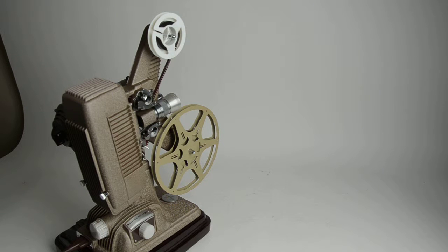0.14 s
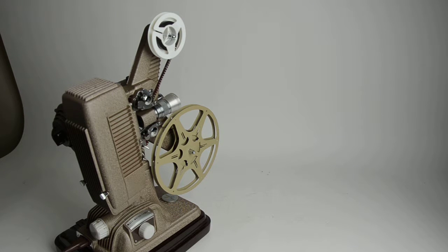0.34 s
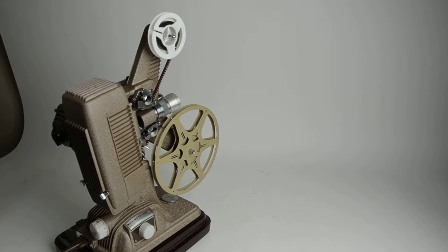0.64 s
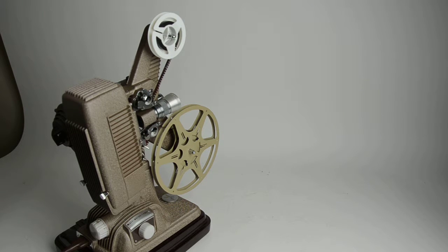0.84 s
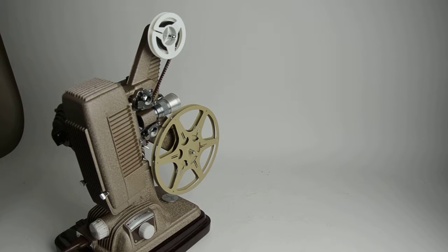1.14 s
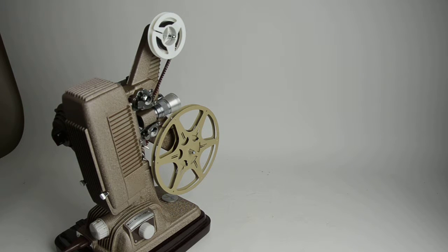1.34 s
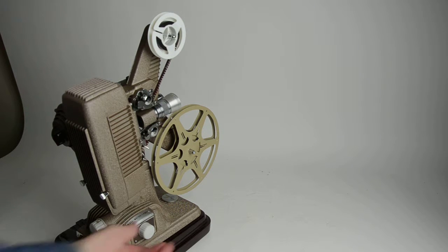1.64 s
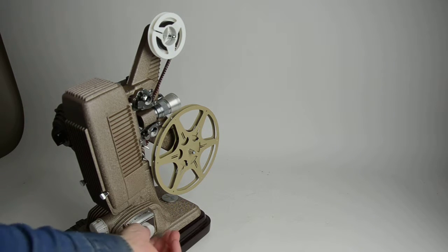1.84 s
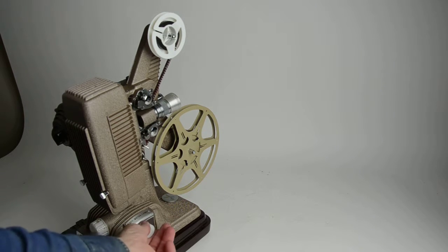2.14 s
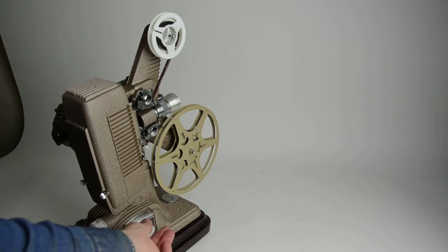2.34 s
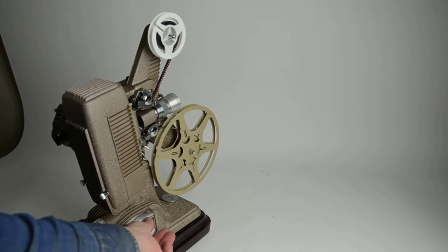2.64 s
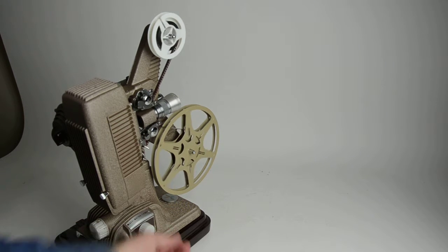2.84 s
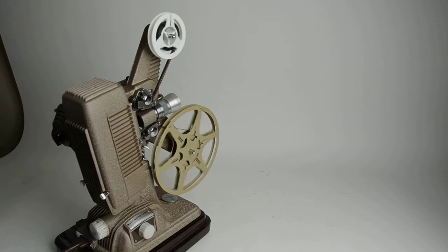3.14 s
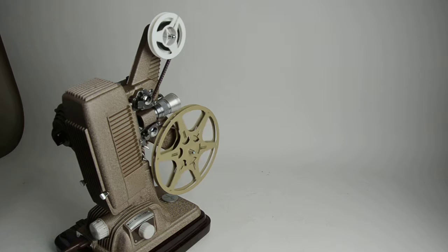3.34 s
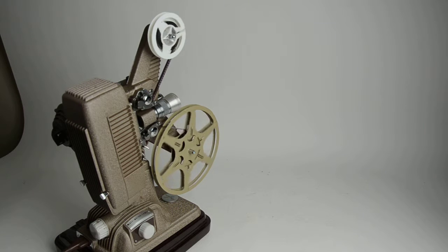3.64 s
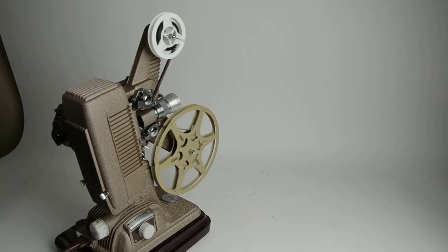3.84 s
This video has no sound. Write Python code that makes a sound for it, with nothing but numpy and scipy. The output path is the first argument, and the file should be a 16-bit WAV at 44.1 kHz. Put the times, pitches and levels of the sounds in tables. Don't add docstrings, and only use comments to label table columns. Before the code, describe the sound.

Quiet room, cloth rustle, a hard switch snap, then a projector motor whirring and clattering.

```python
import sys
import numpy as np
from scipy import signal
from scipy.fft import rfft, irfft, next_fast_len
from scipy.io import wavfile
from scipy.ndimage import uniform_filter1d, map_coordinates

SR = 44100
rng = np.random.default_rng(int(sys.argv[2]) if len(sys.argv) > 2 else 0)


def unload_wav(signal):
    wavfile.write(
        sys.argv[1],
        SR,
        np.round(np.clip(np.atleast_2d(signal).T, -1, 1) * 32767).astype(np.int16),
    )


def decibels_to_gain(level_db):
    exponent = np.asarray(level_db, float) / 20
    return 10 ** exponent


N = 176400
TIME = np.arange(N) / SR
ON_S = 2.4

# centre_hz, width_hz, level_db
FRAME_MODES = [(662.5, 12.3, -1), (763, 24, -8), (914, 14.5, -0.5), (1046, 42, -8), (1123, 16.5, -9.5),
               (1200, 32, -11), (1410, 30, -20), (1650, 45, -22), (1890, 190, -12), (2105, 48, -6),
               (2236, 98, -13.5), (2710, 150, -19), (3210, 160, -15.5)]
# centre_hz, width_hz, level_db
GRILLE_MODES = [(3210, 120, -1), (5080, 160, 0), (6650, 220, 1), (7540, 160, 1), (8000, 360, -1),
                (9110, 320, -4), (9570, 180, -6), (9930, 150, -4), (10300, 250, -8), (11500, 200, -12)]


def unit(x):
    return x / np.sqrt(np.mean(x ** 2) + 1e-20)


def along(points, hz):
    f, v = np.transpose(points)
    return np.interp(np.log(hz + 1), np.log(f + 1), v)


def curve(rows):
    return np.interp(TIME, *np.transpose(rows))


def wobble(rate):
    return map_coordinates(rng.standard_normal(N // 100), [TIME * rate])


def filtered(x, response):
    m = next_fast_len(N + SR // 2)
    return irfft(rfft(x, m) * response(np.fft.rfftfreq(m, 1 / SR)), m)[:N]


def band(f, centre, width):
    return 1j * f * width / (centre * centre - f * f + 1j * f * width)


def body(peaks):
    return lambda f: sum((-1) ** k * decibels_to_gain(db) * band(f, c, w) for k, (c, w, db) in enumerate(peaks))


def hiss(spectrum):
    def colour(hz):
        return decibels_to_gain(along(spectrum, hz) - 60 * (hz > spectrum[-1][0]))
    return unit(filtered(rng.standard_normal(N), colour))


def steady(x):
    return x / np.sqrt(np.abs(uniform_filter1d(x ** 2, size=SR // 8)) + 0.011 * np.mean(x ** 2))


def room_tone():
    # pitch_hz, density_db
    air_colour = [(25, -25), (100, -14), (260, -4), (500, -9), (1500, -12), (4000, -20), (6500, -29.5),
                  (10000, -38), (15700, -56)]
    # centre_hz, width_hz, level_db
    appliance = [(58, 6.6, -77), (118, 6.7, -78), (156.6, 3.6, -61.5), (257.6, 8.7, -67.5),
                 (294.4, 4.7, -61), (430, 5.1, -69.5), (784, 15, -68), (1394, 49, -69.5), (3820, 33, -80.5),
                 (4540, 130, -73.5), (5500, 340, -69.5)]
    air = decibels_to_gain(-54.5 + 0.33 + 0.3 * wobble(4.2)) * hiss(air_colour)
    drones = np.zeros(N)
    for hz, width, db in appliance:
        narrow = filtered(rng.standard_normal(N), lambda f: band(f, hz, width) ** 2)
        drones += decibels_to_gain(db) * steady(narrow)
    whine_hz, whine_db = 15681, -79
    return air + drones + np.sqrt(2) * decibels_to_gain(whine_db) * np.sin(2 * np.pi * whine_hz * TIME)


def hand():
    # time_s, level_db
    rubbing = [(0., -79), (.7, -89), (.82, -72), (1., -79), (1.2, -69), (1.3, -72), (1.6, -64.5),
               (1.84, -65.5), (1.9, -78), (1.99, -75), (2.05, -80), (2.4, -99)]
    # pitch_hz, density_db
    cloth = [(400, 6), (1500, -2), (3000, 1.5), (6000, -5), (10000, -8.5), (15000, -28)]
    # time_s, level_db, pitch_hz, scuff_share
    contacts = [
        (.38, -55.5, 430, 0.27),
        (1.555, -53.5, 564, 1),
        (1.59, -57, 520, .3),
        (1.751, -50, 658, 0.7),
        (1.875, -59, 3100, .8),
        (1.986, -50, 745, 0.73),
        (2.1, -49, 500, .25),
        (2.19, -58, 2700, 1),
    ]
    # start_s, end_s, level_db, pitch_hz
    squeak = (1.745, 1.835, -57, 2900)
    out = decibels_to_gain(curve(rubbing) + 6.0 + 1.5 * wobble(24.9)) * hiss(cloth) * (TIME < ON_S)
    skin = [(300, -4), (1200, -1.5), (3000, -2.5), (9000, -23)]  # Hz, dB per Hz
    for s, db, hz, scuff in contacts:
        swell = np.exp(-((TIME - s) / 0.012) ** 2)
        thump = np.sin(2 * np.pi * hz * TIME + 2.0 * wobble(50.0))
        out += decibels_to_gain(db) * swell * (thump + scuff * hiss(skin))
    start, end, db, hz = squeak
    knob = body([(hz * .92, 150, 0.), (hz * 1.1, 250, -4), (hz * 1.35, 700, -11)])
    rub = unit(filtered(rng.standard_normal(N), knob))
    gate = uniform_filter1d(1. * (TIME > start) * (TIME < end), size=600)
    return out + decibels_to_gain(db + 1.9 * wobble(57.7)) * rub * gate


def switch():
    # time_s, level_db
    contacts = [
        (2.4001, -11),
        (2.4017, -8),
        (2.4048, -4.5),
        (2.4081, -17.5),
        (2.4096, -6.5),
        (2.415, -10),
    ]
    # pitch_hz, level_db, t60_s
    panel = [(385, -6, .09), (738, 1, .045), (1152, -24, .03), (1642, -12, .025), (2180, -8, .028),
             (2428, -11, .025), (2750, -11, .02), (3100, -9, .02), (4134, -11, .022), (4544, -7, .035),
             (5300, -14, .025)]
    # pitch_hz, density_db
    crack_colour = [(250, -9.5), (720, 2), (950, -5), (1700, -3.5), (2600, -4.5), (4500, -11.5),
                    (10500, -18.5), (15700, -47)]
    out, t = np.zeros(N), TIME[:SR // 3]
    noise = hiss(crack_colour)
    for s, db in contacts:
        i = round(s * SR)
        ring = np.zeros(len(t))
        for hz, level, t60 in panel:
            ring += decibels_to_gain(level + rng.normal(0, 0.98) - 60 * t / t60) * np.sin(2 * np.pi * hz * t)
        crack = decibels_to_gain(-60 * t / 0.014) * noise[i:i + len(t)]
        attack = 1 - np.exp(-t / 0.00019)
        out[i:i + len(t)] += decibels_to_gain(db) * attack * (0.34 * ring + 0.79 * crack)
    return out


def rotor():
    top_rps, run_up_s = 70.26, .286
    since = np.maximum(TIME - ON_S, 0)
    speed = 1 - np.exp(-since / run_up_s)
    return speed, top_rps * (since - run_up_s * speed)


def film_pull():
    return np.tanh((TIME - 3.78) / 0.08)


def motor():
    speed, turns = rotor()
    shaft = decibels_to_gain(-55.5 + 1.1 * wobble(4.54)) * speed ** 6.5 * np.sin(2 * np.pi * turns)
    hum_hz, hum_db, inrush_db = 120.1, -61.5, 4
    hum_level = decibels_to_gain(hum_db + inrush_db * (0.5 - speed) + 1.3 * wobble(5.95))
    hum = hum_level * (speed > 0) * np.sin(2 * np.pi * hum_hz * TIME)
    return np.sqrt(2) * (shaft + hum)


def worn(turns):
    worn_share, wear_per_s = .62, 3
    size, age = 1024, TIME * wear_per_s
    tracks = rng.standard_normal((int(age[-1]) + 2, size))
    old = age.astype(int)
    place = (turns % 1 * size).astype(int)
    fade = age % 1 * np.pi / 2
    repeat = np.cos(fade) * tracks[old, place] + np.sin(fade) * tracks[old + 1, place]
    fresh = rng.standard_normal(N)
    return np.sqrt(worn_share) * repeat * (turns > 0) + np.sqrt(1 - worn_share) * fresh


def fan():
    # pitch_hz, density_db
    air_colour = [(200, -0.5), (350, -6.5), (900, -6.5), (2200, -10), (4000, -16), (8500, -16.5),
                  (11500, -20.5), (15700, -45.5)]
    speed, turns = rotor()
    stroke = np.exp(-((turns + .06) % 1) / .3) - .6
    stroke_db = 6.5 * (1 - speed) ** .9 * 2 + 1.5
    beat_db = stroke_db * uniform_filter1d(stroke, size=110)
    beat = decibels_to_gain(beat_db + 0.49 * np.cos(6 * np.pi * turns) + 0.43 * wobble(24.0))
    rush = unit(filtered(worn(turns), lambda hz: decibels_to_gain(along(air_colour, hz))))
    air = decibels_to_gain(-29) * speed ** 1.1 * rush
    grille = decibels_to_gain(-37.5) * speed ** 1.6 * unit(filtered(worn(turns), body(GRILLE_MODES)))
    starts = np.diff(np.floor(turns + 0.044), prepend=0) * decibels_to_gain(2.0 * rng.standard_normal(N))
    t = TIME[:SR // 10]
    gate = signal.fftconvolve(starts, np.exp(-t / .007) * np.minimum(t / .003, 1))[:N]
    tone = [(500, -1.5), (2500, -5.0), (6000, -10.0), (9500, -8), (12000, -27), (15500, -48)]  # Hz, dB per Hz
    scrape = decibels_to_gain(-25.5) * speed ** 0.44 * (1.3 - speed) ** .5 * gate * hiss(tone)
    return beat * (air + grille) + scrape


def knocking(turns, scatter_db, rough):
    # place_turns, level_db, scatter_turns
    knocks = [
        (0., 0, .003),
        (.125, -6, .005),
        (.31, -8, .005),
        (.62, -5, .004),
    ]
    train, whole = np.zeros(N), np.arange(1, int(turns[-1]))
    for place, db, scatter in knocks:
        luck = rng.standard_normal((len(whole), 2))
        at = np.searchsorted(turns, whole + place + scatter * luck[:, 0])
        np.add.at(train, np.minimum(at, N - 1), decibels_to_gain(db + scatter_db * luck[:, 1]))
    power = signal.fftconvolve(train ** 2, np.exp(-TIME[:SR // 50] / 0.0036))[:N]
    grind = np.sqrt(np.abs(power)) * rng.standard_normal(N)
    rough = np.clip(rough, 0, 1)
    clean = unit(train - uniform_filter1d(train, size=301))
    return np.sqrt(1 - rough) * clean + np.sqrt(rough) * unit(grind)


def housing():
    # time_s, level_db
    rattle = [(2.48, -36), (2.53, -32), (2.62, -25.5), (2.75, -25.5), (2.83, -32), (2.9, -21.5),
              (2.97, -31.5), (3.07, -30.5), (3.14, -24.5), (3.27, -27.5), (3.4, -32), (3.5, -29),
              (3.58, -38), (3.68, -32), (3.75, -42.5), (3.9, -34), (4., -53)]
    # centre_hz, width_hz, level_db
    cover_modes = [(320, 25, -17), (409, 16, -6), (464, 18, 0), (522, 16, 0), (604, 18, -12)]
    speed, turns = rotor()
    cover = steady(filtered(knocking(turns, scatter_db=2, rough=.12), body(cover_modes)))
    frame = steady(filtered(knocking(turns, scatter_db=3, rough=.15), body(FRAME_MODES)))
    frame_level = decibels_to_gain(-34 + 1 * film_pull() + 1.2 * wobble(5.35)) * speed ** 1.2
    return decibels_to_gain(curve(rattle)) * np.clip(turns, 0, 1) * cover + frame_level * frame


def jolts():
    # time_s, peak_db
    slaps = [(2.493, -22), (2.538, -16.5), (2.573, -25.5), (2.602, -18), (2.781, -29), (2.872, -17.5),
             (2.886, -18), (2.957, -14.5), (3.023, -14.5), (3.094, -26), (3.113, -19.5), (3.146, -17),
             (3.206, -13), (3.286, -15), (3.341, -16), (3.416, -11.5), (3.618, -20), (3.639, -41),
             (3.664, -18), (3.712, -26), (3.738, -31), (3.85, -20.5), (3.884, -27), (3.905, -36),
             (3.955, -19.5), (3.979, -35)]
    # centre_hz, width_hz, level_db
    seat = [(383, 33, -12), (466, 66, 5), (543, 73, 8), (707, 57, -3), (1013, 85, -10)]

    def soft(f):
        return body(seat)(f) / (1 + 1j * f / 1500) ** 2

    train = np.zeros(N)
    s, db = np.transpose(slaps)
    train[np.round(s * SR).astype(int)] = decibels_to_gain(db - 3)
    single = filtered(np.eye(1, N)[0], soft)
    return filtered(train, soft) / np.abs(single).max()


def armature():
    # shaft_multiple, level_db
    order_tones = [(4, -49), (5, -49), (6, -46), (24, -48), (26, -47), (32, -45), (60, -53), (120, -50)]
    # shaft_multiple, level_db
    brush_tones = [(73, -46), (94, -41), (96, -42), (98, -46), (108, -45), (116, -49), (142, -48)]
    speed, turns = rotor()

    def tone(k):
        drift_rad = .7 * wobble(12.)
        return decibels_to_gain(5.5 * wobble(6.09)) * np.sin(2 * np.pi * k * turns + drift_rad)

    def chord(rows):
        return sum(decibels_to_gain(db) * tone(k) for k, db in rows)

    through_grille = filtered(chord(brush_tones), body(GRILLE_MODES))
    free = decibels_to_gain(-8) * speed ** 5.5 * (chord(order_tones) + through_grille)
    shaking = speed ** 0.7 * sum(tone(k) for k in range(9, 19))
    frame = decibels_to_gain(-36 + 2.5 * film_pull()) * filtered(shaking, body(FRAME_MODES))
    return np.sqrt(2) * (free + frame)


def walls(x):
    # pitch_hz, t60_s
    decay = [(300, 0.3), (2000, 0.36), (10000, 0.2)]
    hz, t, z = signal.stft(rng.standard_normal(SR // 2), SR, nperseg=256)
    tail = signal.istft(z * decibels_to_gain(-60 * t / along(decay, hz)[:, None]), SR, nperseg=256)[1]
    return signal.fftconvolve(np.pad(x, (200, 0)), tail / np.linalg.norm(tail))[:N]


def small_radiator(f):
    s = 1j * f / 337
    return (s * s / (1 + 1.4 * s + s * s)) ** 2


def scene():
    near = filtered(switch() + housing() + jolts() + armature() + fan(), small_radiator)
    mono = near + decibels_to_gain(-9.5) * walls(near) + motor() + hand() + room_tone()
    return np.array([mono, mono])


def band_limit(x):
    return signal.sosfilt(signal.butter(12, 15890, fs=SR, output="sos"), x)


def record(dry):
    # centre_hz, width_hz, depth_share
    notches = [(5675, 590, 0.77), (6880, 480, 0.4), (14900, 170, .8)]

    def port(f):
        cuts = [1 - np.clip(depth, 0, 1) * band(f, c, w) for c, w, depth in notches]
        return (f < 15760) * np.prod(cuts, axis=0)

    mono = filtered(dry[0], port)
    return band_limit(np.array([mono, mono]))


dry = scene()
out = record(dry)
unload_wav(out)
```